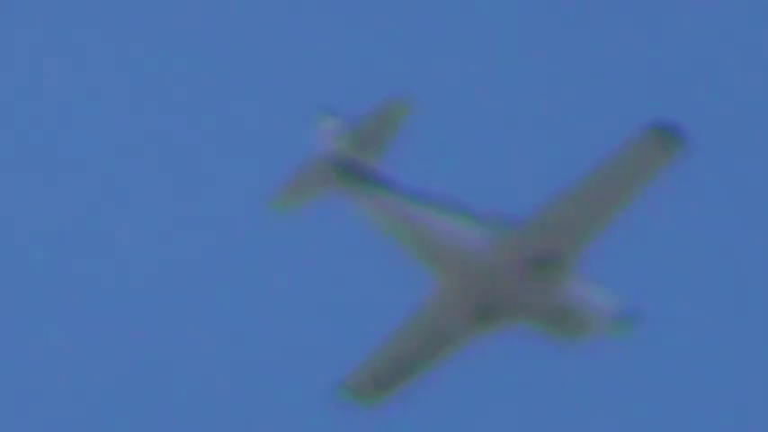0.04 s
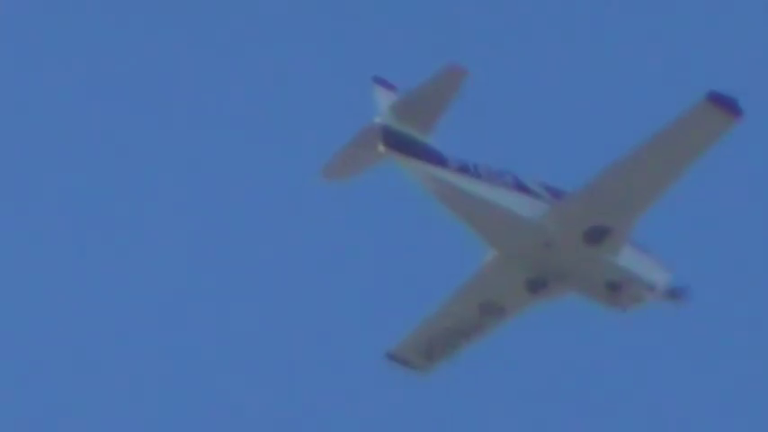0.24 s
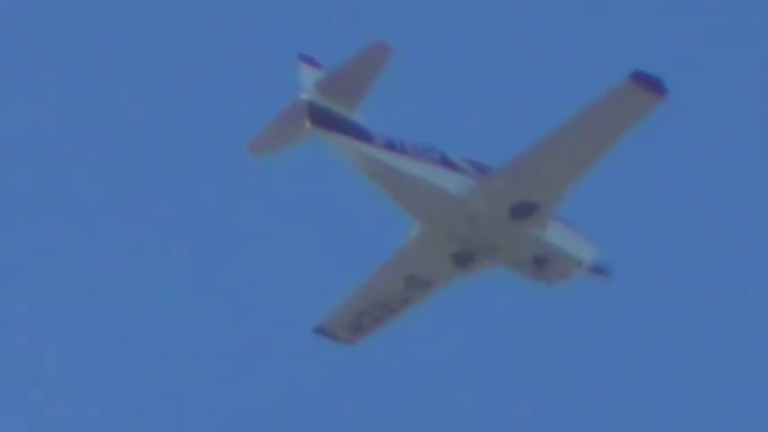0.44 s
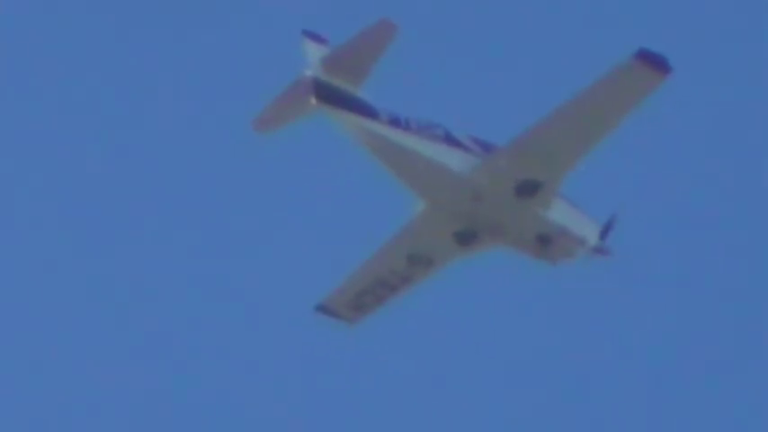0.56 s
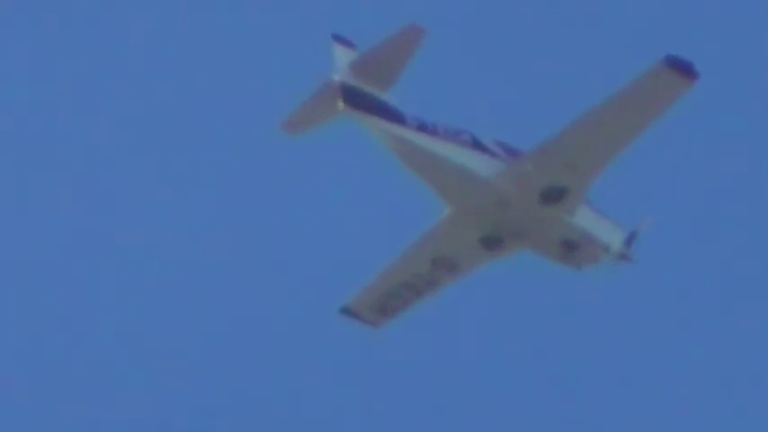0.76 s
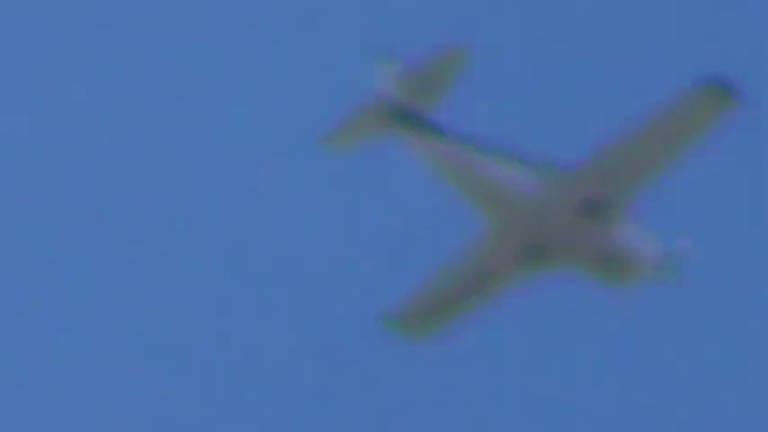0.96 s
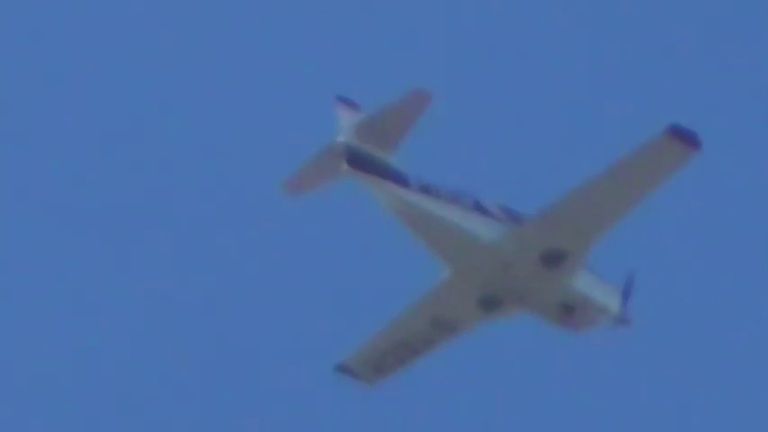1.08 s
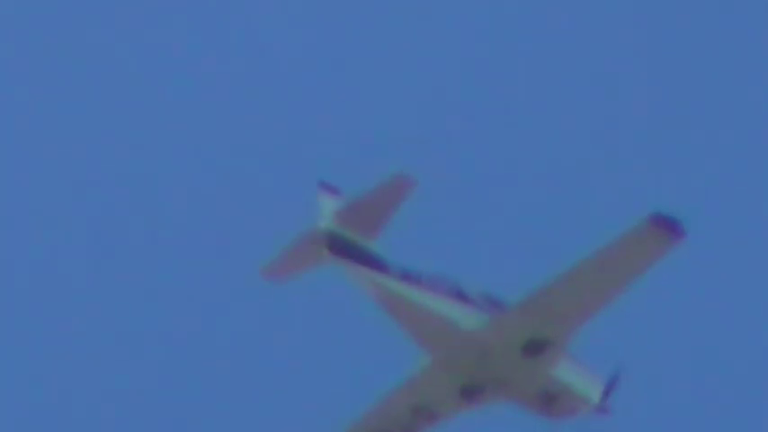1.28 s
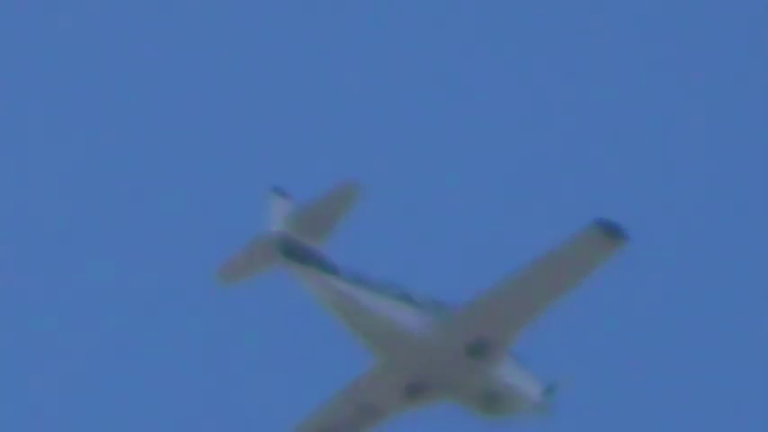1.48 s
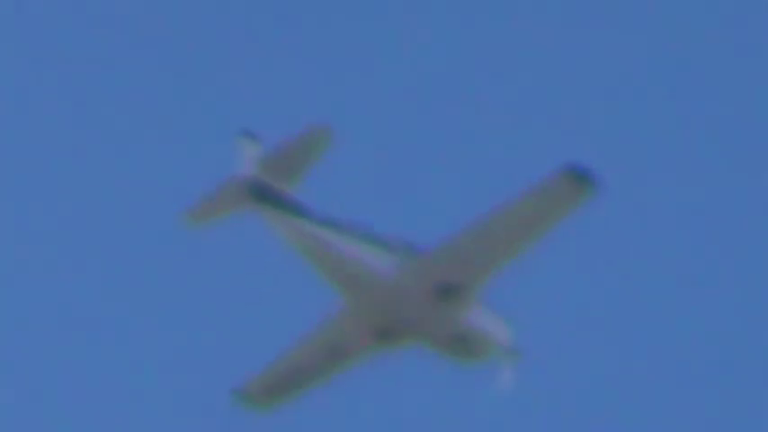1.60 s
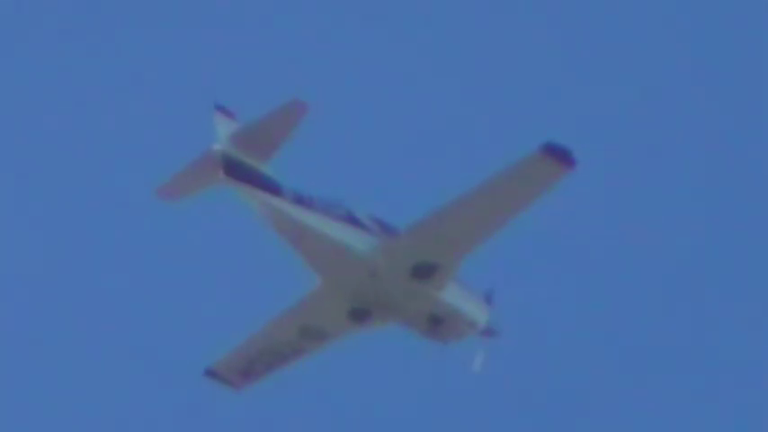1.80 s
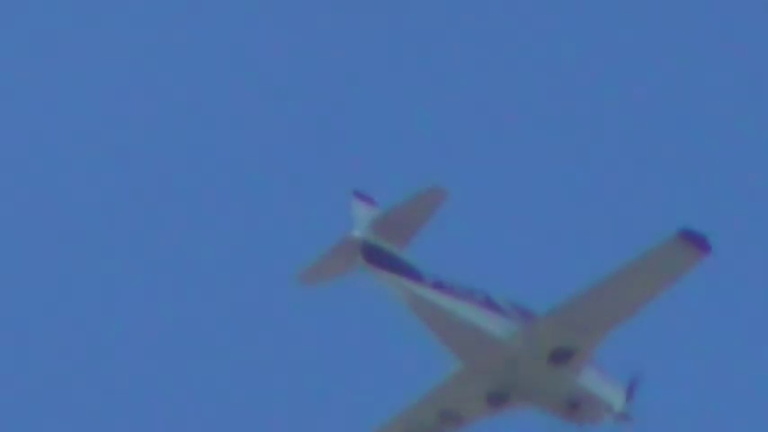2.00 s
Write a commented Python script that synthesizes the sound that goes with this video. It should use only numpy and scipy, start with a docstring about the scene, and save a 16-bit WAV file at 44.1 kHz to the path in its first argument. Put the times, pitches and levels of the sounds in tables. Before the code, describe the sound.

A small plane's steady, airy engine drone, with wind bumping the microphone and faint ticks.

```python
"""A distant propeller plane in the wind

A light plane drones far overhead and slowly draws away: faint engine tones in a broad, airy roar.
Gusts buffet a small camera's microphone, and its lens motor ticks in short bursts.
A thin hiss lies under it all, and one brighter snap comes near the end."""
import sys
import numpy as np
from scipy import signal
from scipy.fft import rfft, irfft, next_fast_len
from scipy.io import wavfile
from scipy.ndimage import uniform_filter1d, map_coordinates

SR = 44100
rng = np.random.default_rng(int(sys.argv[2]) if len(sys.argv) > 2 else 0)


def persist_wave(psi):
    """Save psi, clipped to +-1, as 16-bit WAV."""
    counts = np.round(np.clip(psi, -1, 1) * 32767).astype(np.int16)
    wavfile.write(sys.argv[1], SR, np.atleast_2d(counts).T)


N = 89964

# Tone colour of the camera's hiss and of an airy treble rustle: pitch_hz, level_db
HISS_COLOUR = [(2000, -50), (4000, -7.5), (9000, 0), (12000, -2.5), (15700, -4.5)]
RUSTLE_COLOUR = [(2500, -62), (4000, 6.5), (5500, 0), (7600, 0.5), (8800, -5), (11000, -53), (14000, -120)]
# How the rustle swells and fades: time_s, level_db
RUSTLE_LEVEL = [(0.03, -69.5), (0.672, -66.5), (0.84, -63.5), (0.9, -61), (1.03, -62.5), (1.09, -64.5),
                (1.296, -63), (1.532, -66), (2.0, -63.5)]
# How alike left and right are in hiss and rustle (1 = the same): pitch_hz, likeness
HISS_LIKENESS = [(6400, 1), (7100, 1), (7900, .3), (12000, 0.25)]
# The lens motor's ticks and the one snap: start_s, level_db
LENS_TICKS = [(0.0493, -47.5), (0.173, -52), (0.1925, -46.5), (0.2194, -51), (0.2394, -50), (0.2798, -41.5),
              (0.2994, -54), (0.3187, -42.5), (0.3595, -47), (0.5931, -50.5), (0.6194, -47), (0.7347, -52),
              (0.849, -46), (0.8894, -46), (0.9293, -44), (0.9494, -45), (0.9694, -49), (1.0101, -43),
              (1.0296, -41), (1.0889, -53), (1.6144, -52)]
SNAP = [(1.9663, -58)]
# Where the plastic body rings for each of them: pitch_hz, width_hz, level_db
TICK_RINGS = [(2350, 610, 4), (3760, 970, 2.5), (6800, 3200, -6.5)]
SNAP_RINGS = [(7400, 2800, 3.5)]
# Tone colour of each part of the wind: pitch_hz, level_db
RUMBLE_COLOUR = [(14, -43), (30, -15), (46, -3), (62, 0), (110, -44), (200, -120)]
DULL_BUFFET_COLOUR = [(30, -21), (62, -7.5), (90, 2.5), (145, -2), (200, -21), (450, -53), (1200, -120)]
BRIGHT_BUFFET_COLOUR = [(50, -67), (120, 2), (200, 3.5), (300, -2), (420, -20), (900, -66), (2000, -120)]
FLUTTER_COLOUR = [(40, -31), (120, -5), (290, -3.5), (500, -11.5), (800, -21), (1500, -44), (3000, -120)]
# Strength of the gusts: time_s, rumble_db, buffet_db, flutter_db
GUSTS = [(0, -24, -28.5, -52), (0.04, -55, -26.5, -46), (0.08, -35, -26.5, -48), (0.13, -28, -27.0, -34.5),
         (0.17, -66, -24.5, -42), (0.195, -35, -25, -39.5), (0.22, -22, -21.5, -34), (0.24, -36, -25, -35),
         (0.26, -40, -25, -39), (0.29, -46, -26.5, -37.5), (0.33, -26, -29, -30), (0.37, -46, -34.5, -45),
         (0.41, -39, -34.5, -55), (0.445, -51, -29, -36), (0.48, -29, -34, -45), (0.52, -50, -26.5, -33),
         (0.54, -42, -25.5, -26), (0.56, -34, -22.5, -32), (0.58, -37, -24, -33), (0.595, -40, -35, -28),
         (0.62, -41, -77, -50), (0.66, -56.0, -50, -40), (0.72, -66, -41, -74), (0.79, -55, -44, -51),
         (0.83, -54, -61, -56), (0.865, -57, -27, -37), (0.885, -48, -35, -41), (0.91, -45, -38.5, -24.5),
         (0.93, -48, -30, -33), (0.96, -56, -30, -32), (0.98, -50, -29.5, -37), (1.0, -49, -27.5, -40),
         (1.03, -61, -27.5, -33), (1.043, -58, -46, -46), (1.06, -54, -28.5, -45), (1.078, -50, -45, -58),
         (1.13, -50, -38, -43), (1.18, -58, -40.5, -60), (1.4, -63, -57, -56), (1.7, -48, -41.5, -61),
         (1.8, -59.0, -41, -81), (1.98, -43, -43, -49), (2.04, -57, -76, -71)]
# How much of the buffet is the bright kind (0 to 1): time_s, share
BRIGHT_SHARE = [(0, 0.05), (.25, 0.09), (.31, 0.13), (.55, 0.4), (.9, 0.64), (1.1, 0.92), (1.6, 0.66),
                (2.04, 0.2)]
# The engine's tones: shaft_speed_multiple, level_db
ENGINE_TONES = [(2, -52), (2.5, -60), (3, -46), (3.5, -56), (4, -45), (4.5, -54.5), (5.5, -57), (6, -53),
                (7.5, -51.5), (8, -53), (10, -59.5), (12, -58), (14.5, -52.5)]
# Thin tones that surface briefly in the drone: middle_s, half_length_s, pitch_hz, slide_hz_per_s, level_db
WHINES = [(1.35, 0.18, 694, -30, -45.5), (1.52, 0.13, 643, -8, -48.5)]
# Tone colour of the plane's roar: pitch_hz, level_db
ROAR_COLOUR = [(24, -60), (45, -33), (90, -12.5), (150, -6), (290, -8), (400, -9.5), (560, -9.5), (700, -7),
               (1020, -9), (1250, -15.5), (1700, -19), (2200, -26.5), (3100, -32), (4030, -40.5),
               (6800, -120)]
# Strength of the roar: time_s, level_db
ROAR_LEVEL = [(0.03, -35.5), (0.44, -35), (0.8, -34.5), (1.1, -35.5), (1.5, -35.5), (2.0, -35.5)]
# How alike left and right are in the roar: pitch_hz, likeness
ROAR_LIKENESS = [(100, 0.97), (500, 0.94), (1500, 0.9), (2000, 0.77), (2700, 0.94), (3300, 1)]
# How much louder the plane is on the left: pitch_hz, left_over_right_db
PLANE_BALANCE = [(60, 1), (270, -0.7), (580, 1), (1200, 5), (2500, 3), (3300, 0)]


def amp(db):
    """Turn decibels into a gain to multiply by."""
    return 10 ** (np.asarray(db) / 20)


def unit(x):
    """Scale a signal to an average strength (rms) of 1."""
    return x / np.sqrt(np.mean(x ** 2) + 1e-20)


def along(points, hz):
    """Look up a table's value at any pitch, on a log scale."""
    pitches, values = np.transpose(points)
    return np.interp(np.log(hz + 1), np.log(pitches + 1), values)


def curves(rows):
    """Give one value per sample for each column after the time."""
    times, *columns = np.transpose(rows)
    return [np.interp(np.arange(N) / SR, times, column) for column in columns]


def wobble(rate_hz):
    """A smooth curve through rate_hz random points a second."""
    points = rng.standard_normal(int(N * rate_hz / SR) + 4)
    return map_coordinates(points, [np.arange(N) * rate_hz / SR])


def filtered(x, response):
    """Shape a sound with a gain that depends on pitch."""
    size = next_fast_len(N + SR // 2)
    return irfft(rfft(x, size) * response(np.fft.rfftfreq(size, 1 / SR)), size)[..., :N]


def steady(x, span_s=0.046):
    """Even out a noise's own slow swells."""
    power = uniform_filter1d(np.mean(x ** 2, axis=0), int(span_s * SR))
    return x / np.sqrt(np.abs(power) + 0.12)


def noise(colour, likeness, patchy_db=0.0):
    """Stereo noise of strength 1; patchy_db makes random patches of it louder or softer."""
    grid = signal.stft(rng.standard_normal((2, N)), nperseg=512)[2]
    patches = uniform_filter1d(rng.standard_normal(grid.shape[1:]), size=5, axis=0)  # blur over pitch
    patches = uniform_filter1d(patches, size=10, axis=1)  # and over time
    pair = signal.istft(grid * amp(patchy_db * unit(patches)), nperseg=512)[1][:, :N]
    spread = lambda hz: np.arccos(np.clip(along(likeness, hz), -1, 1)) / 2
    mid, side = filtered(pair, lambda hz: amp(along(colour, hz)) * [np.cos(spread(hz)), np.sin(spread(hz))])
    return unit(np.array([mid + side, mid - side]))


def hiss():
    """An airy rustle swells and fades over the camera's steady hiss."""
    rustle_db, = curves(RUSTLE_LEVEL)
    rustle = amp(rustle_db) * noise(RUSTLE_COLOUR, HISS_LIKENESS, patchy_db=2.5)
    return rustle + amp(-67) * noise(HISS_COLOUR, HISS_LIKENESS, patchy_db=1.5)


def clicks(events, rings, fade_s, boost_db=5, contact_db=11.5):
    """A sharp contact and a rattle that drops 60 dB in fade_s make a small plastic body ring."""
    t = np.arange(SR // 40) / SR
    shape_db = boost_db - 60 * t / fade_s + contact_db * (t == 0)
    hits = np.zeros(N + SR)
    for start_s, level_db in events:
        rattle = np.sign(rng.standard_normal(len(t)))
        hits[round(start_s * SR):][:len(t)] += amp(level_db + shape_db) * rattle

    body = lambda hz: sum((-1) ** k * amp(db) * 1j * hz * width / (pitch ** 2 - hz ** 2 + 1j * hz * width)
                          for k, (pitch, width, db) in enumerate(rings))
    return filtered(hits[:N], lambda hz: body(hz) ** 2)


def wind(lump_db=1, lump_rate_hz=42, peak_limit=2.6, low_cut_hz=70):
    """Gusts press on both microphone openings: they share rumble and buffet, but flutter separately."""
    rumble_db, buffet_db, flutter_db = curves(GUSTS)
    share = np.clip(curves(BRIGHT_SHARE)[0], 0, 1)
    lumps = lambda: amp(lump_db * wobble(lump_rate_hz))
    rumble = steady(noise(RUMBLE_COLOUR, likeness=[(50, 0.97)], patchy_db=1.0))
    dull = noise(DULL_BUFFET_COLOUR, likeness=[(100, 0.98)])
    bright = noise(BRIGHT_BUFFET_COLOUR, likeness=[(100, 0.98)])
    buffet = steady(lumps() * (np.sqrt(1 - share) * dull + np.sqrt(share) * bright))
    buffet /= np.sqrt(1 + (buffet.mean(axis=0) / peak_limit) ** 2)  # round off the peaks
    flutter = steady(lumps() * noise(FLUTTER_COLOUR, likeness=[(100, -0.11)], patchy_db=2.5))
    flutter *= amp(flutter_db) * amp([[-1.8], [1.8]])  # louder on the right
    flutter = filtered(flutter, lambda hz: hz ** 2 / (hz ** 2 + low_cut_hz ** 2))
    return amp(rumble_db) * rumble + amp(buffet_db) * buffet + flutter


def plane(shaft_hz=37.88, sink_hz_per_s=0.2192, shimmer_db=3, drift_rad=0.24, pulse_depth=0.063):
    """Engine tones shimmer through restless air, inside the roar of propeller and exhaust."""
    t = np.arange(N) / SR
    turns = shaft_hz * t - sink_hz_per_s * t ** 2 / 2  # the pitch sinks as the plane draws away
    tones = np.zeros(N)
    for multiple, level_db in ENGINE_TONES:
        strength = np.sqrt(2) * amp(level_db + shimmer_db * wobble(5.23))
        phase = 2 * np.pi * (multiple * turns + rng.random())
        tones += strength * np.sin(phase + drift_rad * wobble(6.28))
    for middle_s, half_length_s, pitch_hz, slide_hz_per_s, level_db in WHINES:
        offset_s = t - middle_s
        phase = 2 * np.pi * (pitch_hz * offset_s + slide_hz_per_s * offset_s ** 2 / 2 + rng.random())
        strength = np.sqrt(2) * amp(level_db + shimmer_db * wobble(12))
        swell = np.exp(-(offset_s / half_length_s) ** 4)
        tones += strength * swell * np.sin(phase)
    roar_db, = curves(ROAR_LEVEL)
    firing = 1 + pulse_depth * np.sin(4 * np.pi * turns)  # two pulses per turn of the shaft
    roar = noise(ROAR_COLOUR, ROAR_LIKENESS) * firing
    roar *= amp(roar_db + 0.51 * wobble(7.92))
    return filtered(roar + tones, lambda hz: amp(np.outer([.5, -.5], along(PLANE_BALANCE, hz))))


def scene():
    """Add up the plane, the wind and the camera's own small sounds."""
    return (plane() + wind()
            + clicks(LENS_TICKS, TICK_RINGS, fade_s=0.02)
            + clicks(SNAP, SNAP_RINGS, fade_s=0.006)
            + hiss())


def record(dry):
    """The camera keeps nothing above 15740 Hz."""
    return filtered(dry, lambda hz: hz < 15740)


dry = scene()
out = record(dry)
persist_wave(out)
```